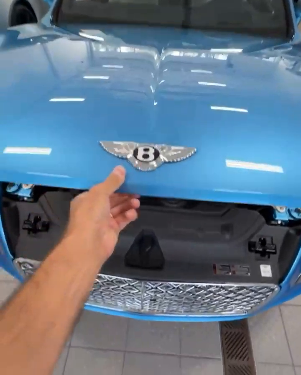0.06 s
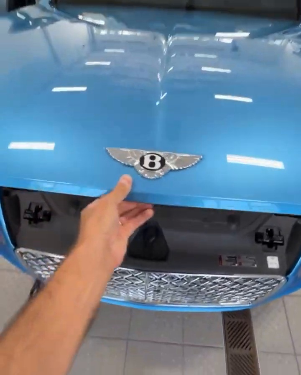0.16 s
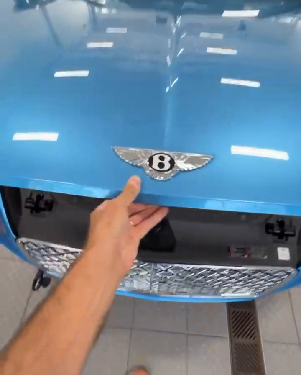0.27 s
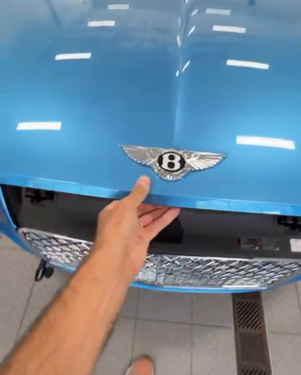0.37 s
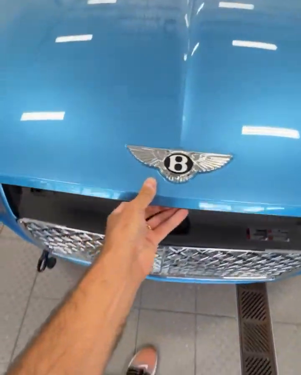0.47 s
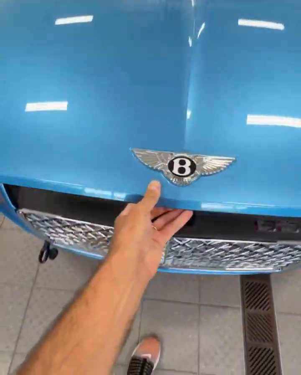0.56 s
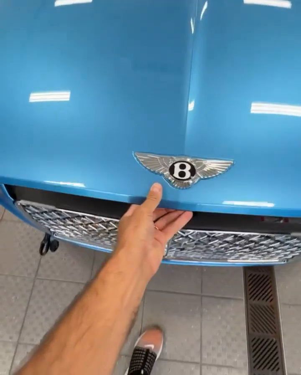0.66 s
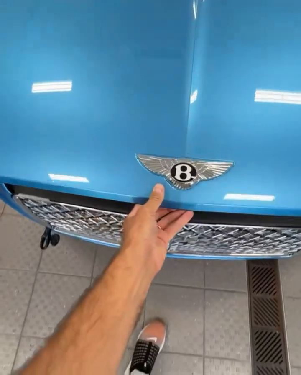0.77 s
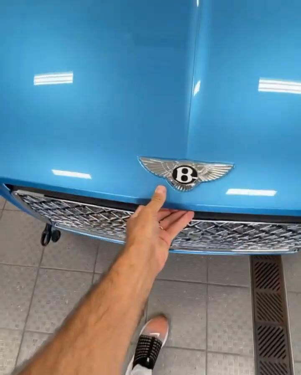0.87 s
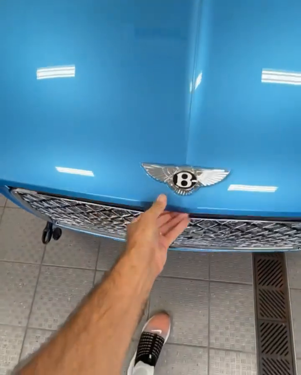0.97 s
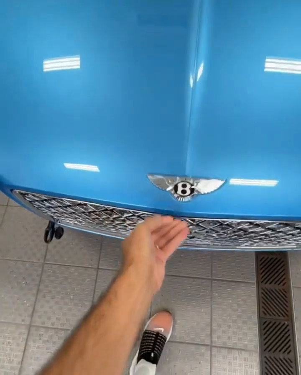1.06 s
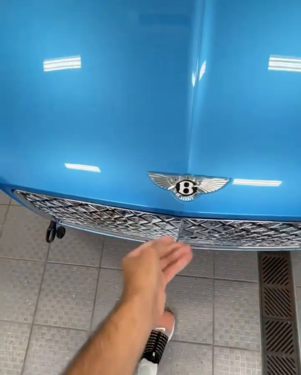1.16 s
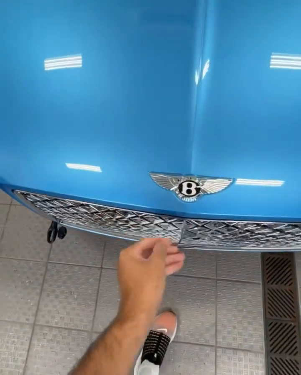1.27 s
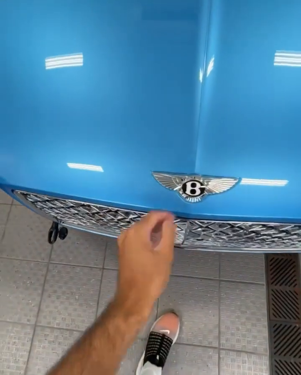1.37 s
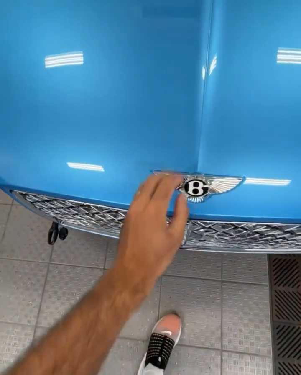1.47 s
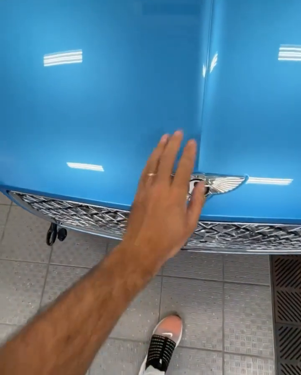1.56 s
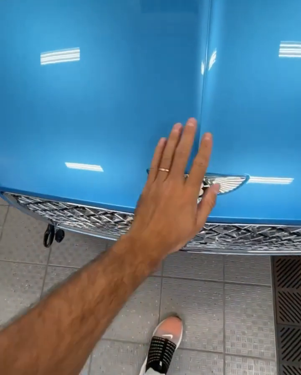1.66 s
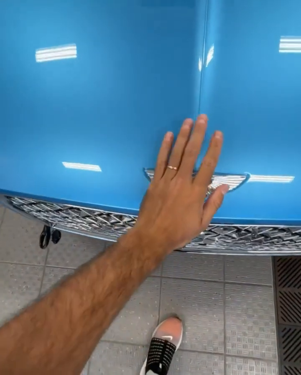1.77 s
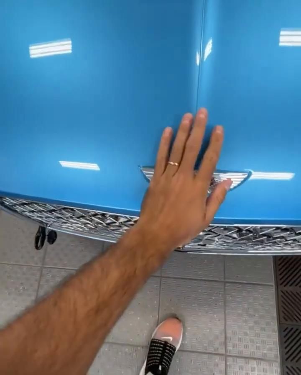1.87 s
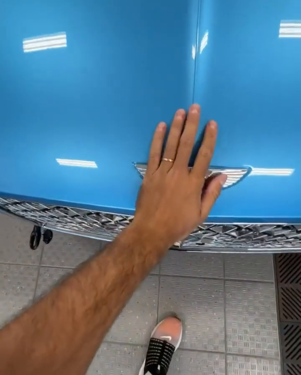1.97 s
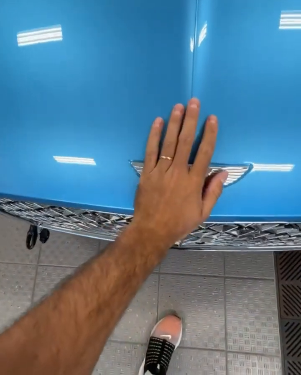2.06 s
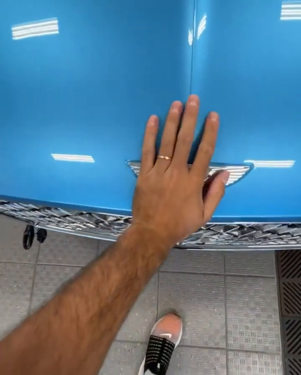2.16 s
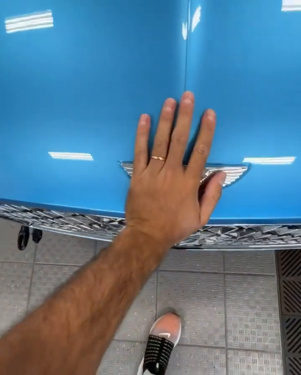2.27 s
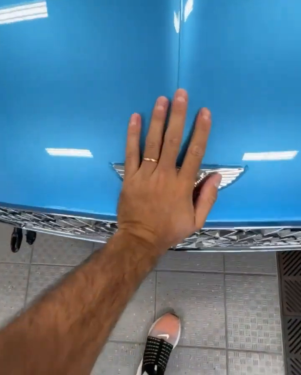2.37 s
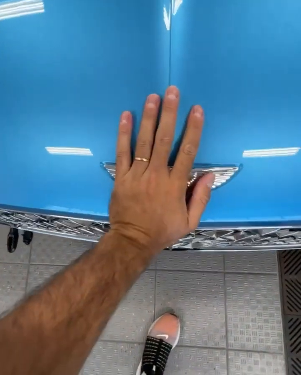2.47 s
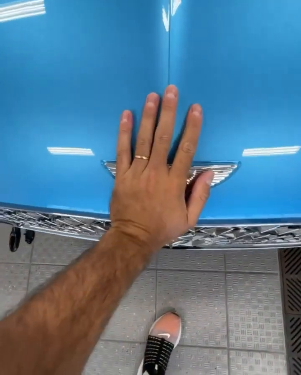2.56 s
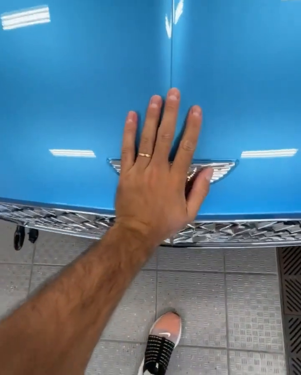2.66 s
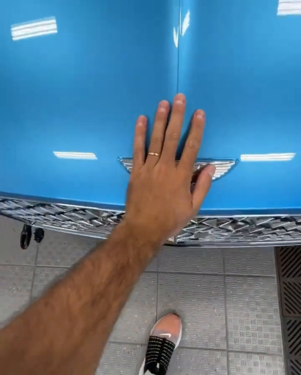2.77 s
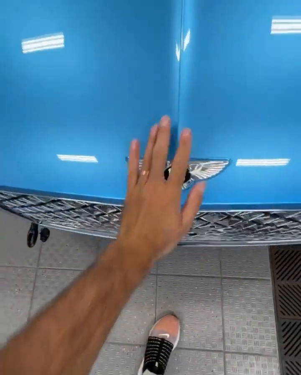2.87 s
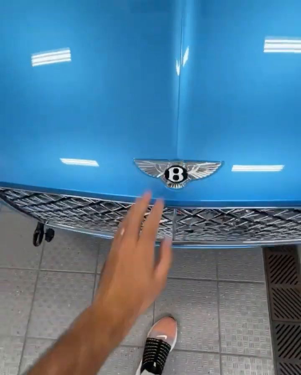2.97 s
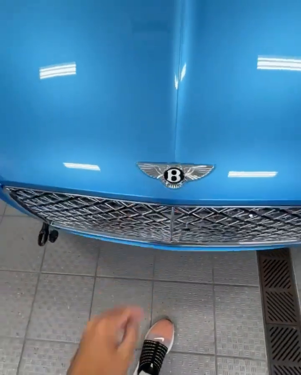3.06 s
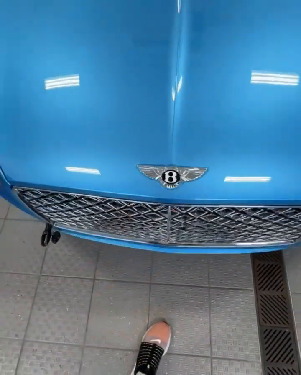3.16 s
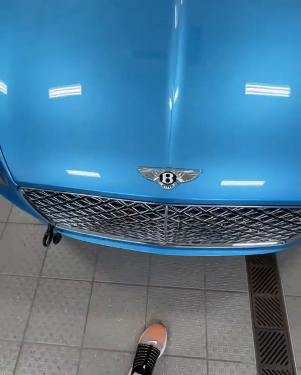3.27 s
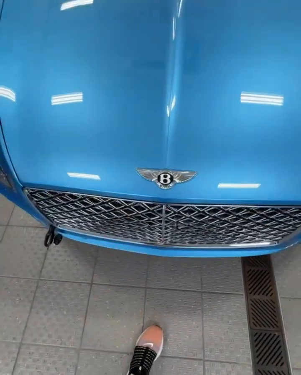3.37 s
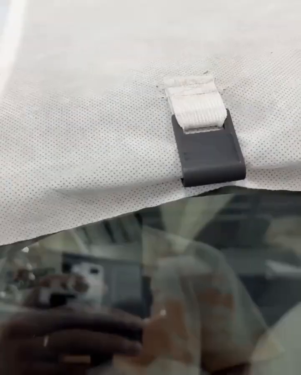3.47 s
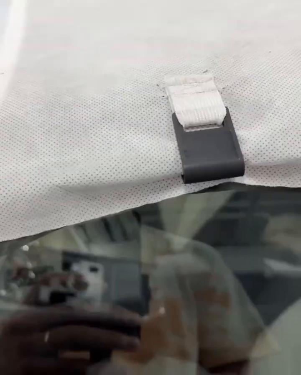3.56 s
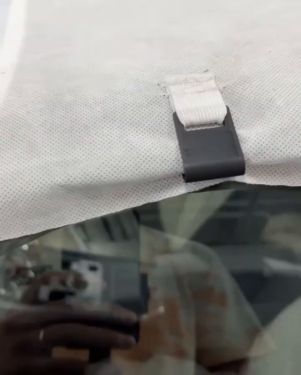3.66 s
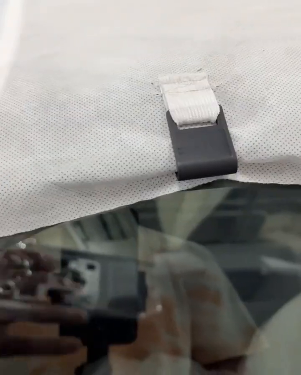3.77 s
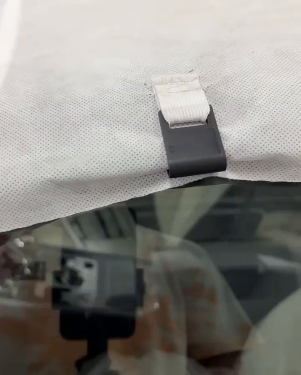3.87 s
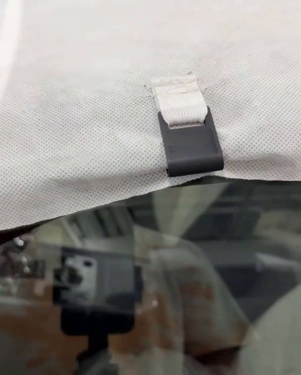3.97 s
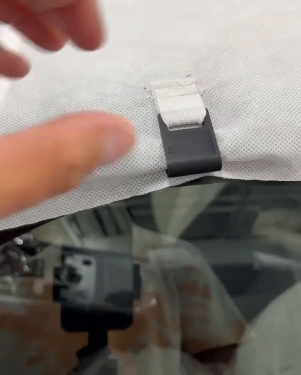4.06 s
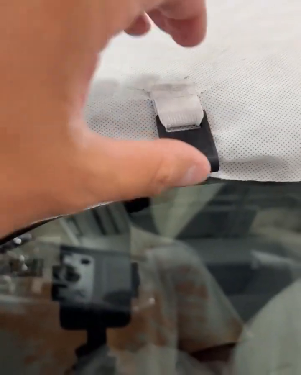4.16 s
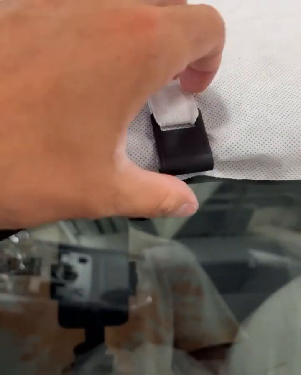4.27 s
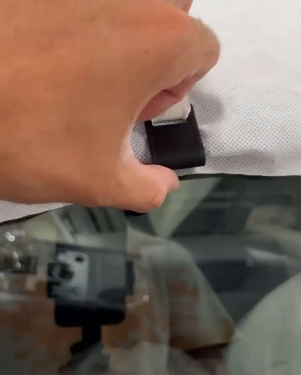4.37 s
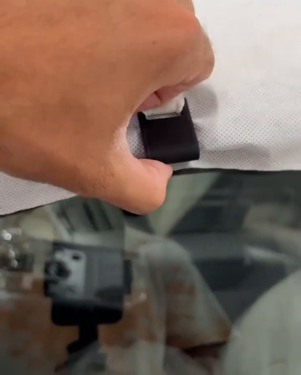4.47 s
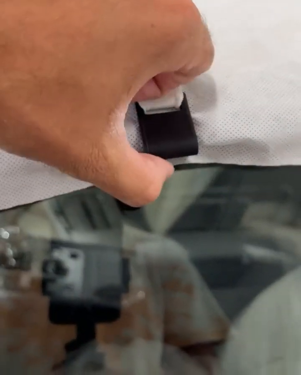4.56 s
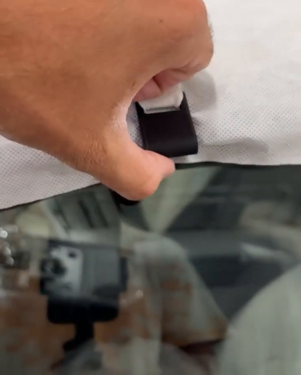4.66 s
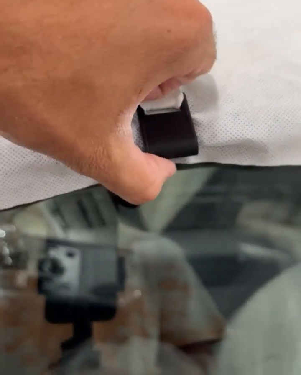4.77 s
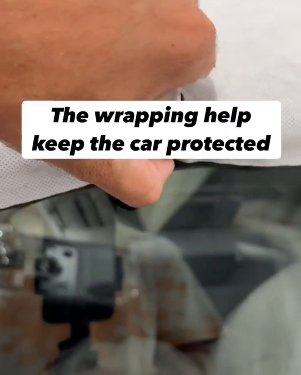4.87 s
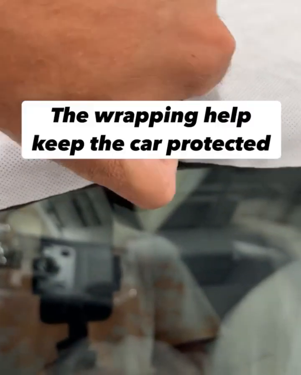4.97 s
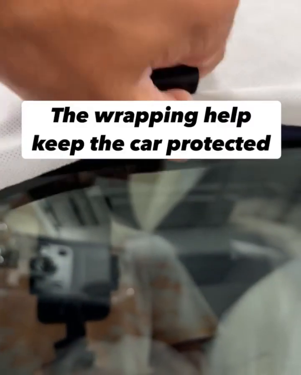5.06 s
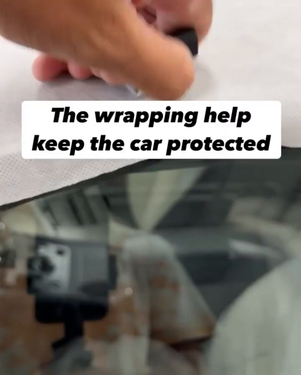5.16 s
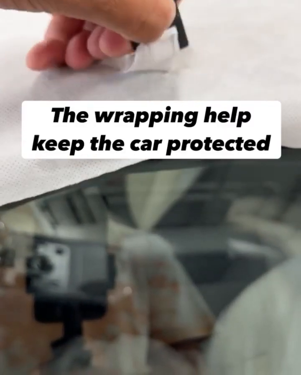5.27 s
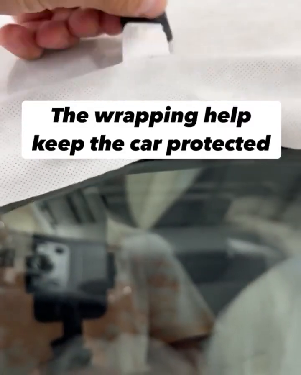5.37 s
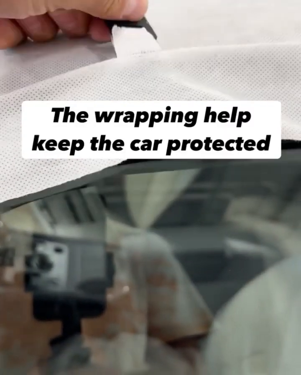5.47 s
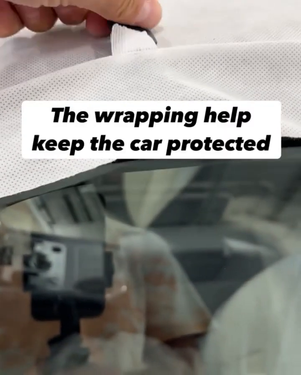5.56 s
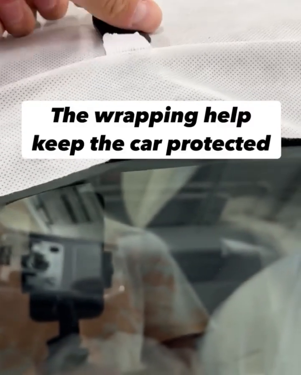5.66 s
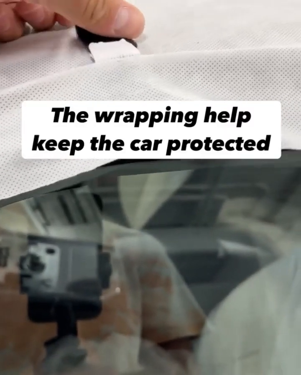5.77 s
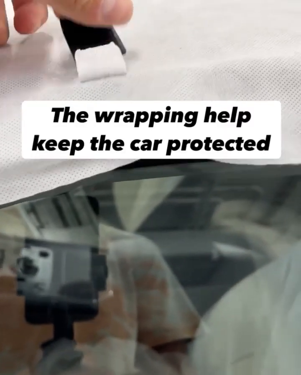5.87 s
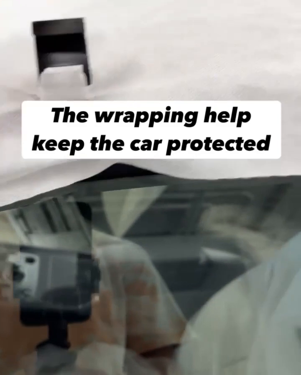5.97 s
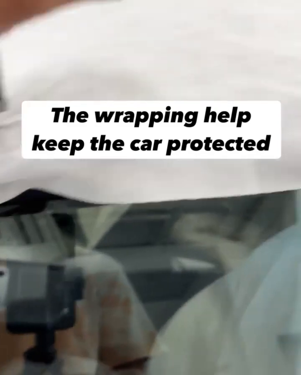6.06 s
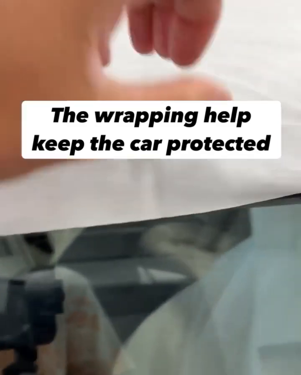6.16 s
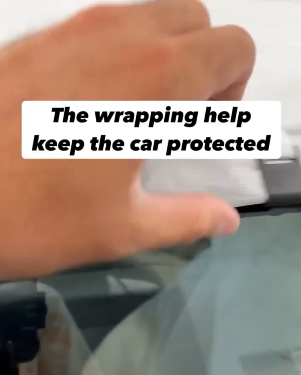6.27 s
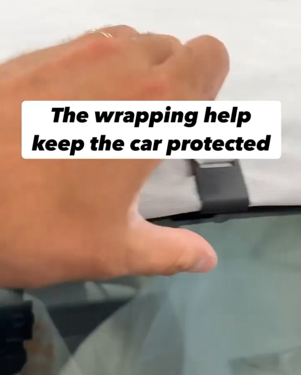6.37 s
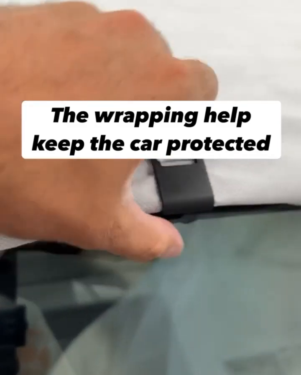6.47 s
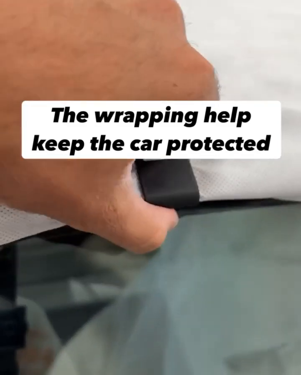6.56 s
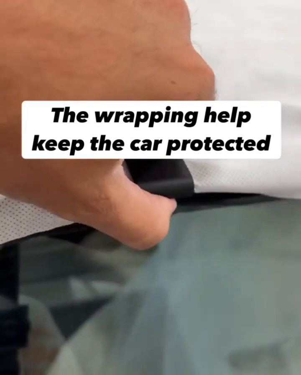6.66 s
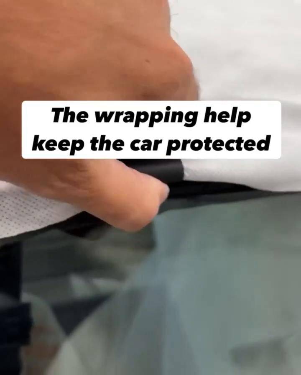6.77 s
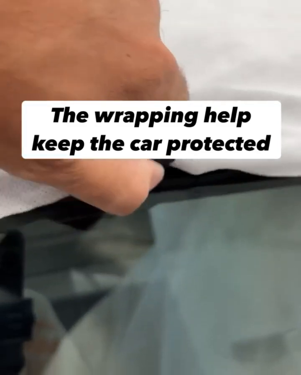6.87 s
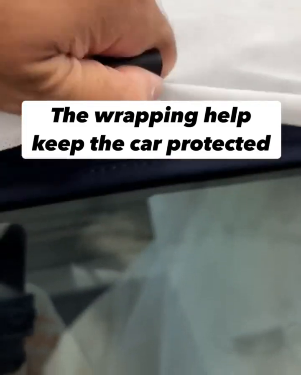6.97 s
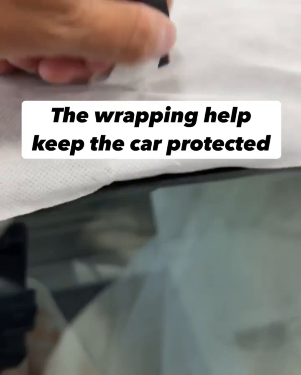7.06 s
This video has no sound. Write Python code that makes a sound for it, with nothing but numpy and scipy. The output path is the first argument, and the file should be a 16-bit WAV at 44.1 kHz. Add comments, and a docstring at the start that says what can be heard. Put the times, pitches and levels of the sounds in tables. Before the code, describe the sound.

Low ventilation rumble fills a tiled showroom, with a faint touch on metal at 0.2 s. At about 1.04 s a car bonnet drops onto its catch: a loud, bright, rattling crash lasting barely 0.15 s, with a heavy panel thump near 1.15 s. A long hard echo rings on and decays. From 2.2 s a palm presses the panel with short, dull, damped knocks, reaching a firm latch clunk with thin steel sizzle at 2.39 s; small thuds follow at 2.6 s and a faint release at 3.07 s. At 3.47 s the echo is cut off by a close, dry place with low wavering hum. Light cloth crackle and small ticks begin around 4.25 s, sharp plastic snaps come at 5.03 and 5.16 s, then rustling strokes. Fabric drags near 6.65 s; the hardest crack, with a deep pane thump, hits at 6.9 s, another snap at 7.05 s.

```python
"""Car bonnet slam, then clips at a window

In a tiled showroom a hand drops a car bonnet onto its catch, then presses until the latch shuts: struck
modes and rattle noise, with a long echo over ventilation. After a cut, close to the microphone, fingers
work plastic clips along a fabric cover at the edge of a window pane: noise cracks over a thumping pane,
and fibre crackle for the cloth, above a low wavering hum.
"""
import sys
import numpy as np
from scipy import signal
from scipy.fft import rfft, irfft
from scipy.io import wavfile
from scipy.ndimage import uniform_filter1d

SR = 44100
rng = np.random.default_rng(int(sys.argv[2]) if len(sys.argv) > 2 else 0)


def master_out(mix):
    """Clip the mix to full scale and print it as 16-bit PCM to the path in sys.argv[1]."""
    frames = np.transpose(np.atleast_2d(mix))
    ceiling = np.clip(frames, -1, 1)
    pcm = np.round(ceiling * 32767).astype(np.int16)
    wavfile.write(sys.argv[1], SR, pcm)


N = 313551

CUT_S = 3.47  # the showroom gives way to the window
PALM_S = 1.8  # from here a palm lies on the panel
# How alike the two microphone ports hear a room. Each row: frequency in Hz, left-right likeness (-1 to 1).
PORT_LIKENESS = [(60, 0.97), (150, 1), (380, 0.42), (950, -0.18), (2380, 0.007), (5980, 0.18),
                 (15000, -0.34)]
# How far a room leans to the left port. Each row: frequency in Hz, left minus right in dB.
PORT_LEAN = [(60, 0.46), (240, 0.175), (950, 2.46), (3770, 4.1), (15000, 25)]


def bonnet():
    """Each blow rings the stiff edge, bends the wide panel, rattles the catch and shakes the car's nose."""
    # Blows on the bonnet. Each row: start in seconds, edge ring peak in dB, panel flex peak in dB,
    # rattle in dB, rattle tilt in dB per octave, body boom peak in dB; all before the left-right lean.
    blows = [(0.214, -36.5, -59.5, -37.5, -9, -58.5), (1.038, -6, -45, -11, -1.5, -44.5),
             (1.051, -4.5, -11, -16, -3, -38.5), (1.063, -6, -12, -11, 1.6, -43),
             (1.071, -7, -25, -12, 5, -45), (1.096, -25, -39, -18, -15, -32),
             (1.116, -20, -61, -28, 1.5, -42.5), (1.151, -10.5, -2, -15.5, 2, -12),
             (1.162, -12, -30, -18, 1, -24), (1.183, -17, -10.5, -25.5, 3.5, -48),
             (2.193, -22.5, -23, -33, -4.5, -38), (2.243, -18.5, -28, -30, -8.5, -27),
             (2.271, -28.5, -23, -53, -22, -46), (2.292, -19, -24, -36, -6, -42),
             (2.308, -22, -21.5, -47.5, -5, -43), (2.337, -24, -15.5, -69, 4, -29),
             (2.369, -21, -9, -31, -6, -55), (2.379, -12.5, -17, -28.5, -4, -33),
             (2.388, -18.5, -8.5, -14, 2, -6), (2.397, -15, -14.5, -16, 0, -25),
             (2.604, -26.5, -36, -60, -9, -24), (2.617, -24.5, -18.5, -59, -11, -20),
             (2.646, -31, -25.5, -55, -6, -36), (3.069, -36.5, -36, -69, -2, -36)]
    # Bending modes of the wide panel. Each row: frequency in Hz, level in dB, free t60 in seconds.
    panel_modes = [(174, -1, 0.12), (198.3, -14.5, 0.17), (258.8, -10.5, 0.12), (168, -23, 0.93),
                   (181.2, -26.5, 1.3)]
    # Modes of the stiff front edge. Each row: frequency in Hz, level in dB, free t60 in seconds.
    edge_modes = [(316, -4.5, 0.0404), (403.7, -10, 0.23), (472.6, -1.5, 0.055), (498, -8.5, 0.17),
                  (567, -0.5, 0.068), (629, -6.5, 0.051), (664, -8.5, 0.11), (724, -13.5, 0.06),
                  (870, -11, 0.035)]
    # Catch and grille, before the tilt of each blow. Each row: frequency in Hz, level in dB per Hz.
    rattle_spectrum = [(410, -86.5), (700, -10), (2100, -14), (3080, -16), (3330, -21), (4060, -25.5),
                       (7870, -30), (11500, -39), (15400, -47.5), (16500, -59.5)]
    # Thin steel sizzle of the latch. One row: level in dB, centre in Hz, width in Hz, t60 in seconds.
    latch_sizzle = (-36, 14600, 1700, 0.1)
    latch_s = 2.388  # the latch shuts
    palm_db_per_s = 277  # extra decay under the palm
    rattle_t60 = 0.089  # seconds, without the palm
    right_lag_ms = 0.28  # the catch is nearer the left port
    bright_lean = amp([[1.25], [-1.25]])  # dB, left then right
    dull_lean = amp([[1.3], [-1.3]])

    out, t = np.zeros((2, N)), np.arange(SR) / SR
    boom = struck([(69, 0, 0.24)], contact_ms=0.93, travel_ms=14.0)  # the nose shakes as a whole
    flex = struck(panel_modes, contact_ms=2.2, travel_ms=9.0)
    for s, edge_db, flex_db, rattle_db, tilt_db, boom_db in blows:
        palm = amp(-palm_db_per_s * t * (s > PALM_S))
        # the tilt turns about 2000 Hz: harder contact is brighter
        colour = [(hz, db + tilt_db * np.log2(hz / 2000)) for hz, db in rattle_spectrum]
        noise = evened(coloured(rng.standard_normal((3, len(t))), colour))
        rattle = 0.21 * noise[0] + noise[1:]  # a little is shared by both ports
        rattle = rattle * amp(rattle_db - 60 * t / rattle_t60) * np.minimum(t / 0.0015, 1)
        edge = amp(edge_db) * struck(edge_modes, contact_ms=0.88, crunch_ms=3.3)
        bright = (edge + rattle) * palm * bright_lean
        add(out[0], s, bright[0])
        add(out[1], s + right_lag_ms / 1000, bright[1])
        dull = amp(flex_db) * flex * palm + amp(boom_db) * boom
        add(out, s, dull * dull_lean)

    db, hz, width, t60 = latch_sizzle
    sizzle = np.array([steep(x, hz, width) for x in rng.standard_normal((2, len(t)))])
    add(out, latch_s, amp(db - 60 * t / t60) * sizzle)
    return out


def hall(x):
    """Showroom echo: sparse taps of random sign, each band dying at its own speed, on three paths."""
    # Decay of the tiled room. Each row: frequency in Hz, t60 in seconds.
    decay = [(60, 1.29), (200, 0.98), (1000, 2.08), (3000, 1.94), (6000, 1.5), (9000, 0.7), (14000, 0.21)]
    # Colour of the echo at its start. Each row: frequency in Hz, level in dB.
    echo_colour = [(60, -2), (200, 1.5), (600, 0.5), (1400, 12), (2600, 2.5), (4000, 6), (8000, 10),
                   (12000, 6)]
    hz, t, _ = signal.stft(np.zeros(2 * SR), SR, nperseg=1024)
    same = np.clip(read(PORT_LIKENESS, hz), -1, 1)[:, None]
    lean = amp(read(PORT_LEAN, hz))[:, None]
    dying = amp(read(echo_colour, hz)[:, None] - 60 * t / read(decay, hz)[:, None])
    turn = 2 * np.pi * 25 * np.arange(4 * SR) / SR  # 25 Hz turn from path to path
    out = np.zeros((2, N))
    for k in range(3):
        taps = np.zeros((2, 2 * SR))
        slots = np.arange(300, 2 * SR - 20, 20)  # one tap at random in every 20 samples
        at = slots + rng.integers(0, 20, (2, len(slots)))
        np.put_along_axis(taps, at, rng.choice([-1., 1.], at.shape), 1)
        z = signal.stft(taps, SR, nperseg=1024)[2]
        z[1] = (same * z[0] + np.sqrt(1 - same ** 2) * z[1]) / lean
        tail = signal.istft(z * dying, SR, nperseg=1024)[1]
        # the three gains keep the total power steady
        fed = x.mean(0)[:4 * SR] * np.sqrt(2 / 3) * np.cos(turn + np.pi * k / 3)
        add(out, 0, signal.fftconvolve(fed[None], tail / np.linalg.norm(tail[0]), axes=1))
    return out


def clips():
    """A short plastic crack, brighter when harder, and the window pane thumping under it."""
    # Clip snaps, ticks and short scrapes. Each row: start in seconds, crack peak in dB,
    # crack centre in Hz, crack t60 in seconds, pane thump peak in dB.
    snaps = [(3.677, -54.5, 927, 0.069, -35), (4.236, -49, 2500, 0.016, -57), (4.251, -52, 900, .025, -33),
             (4.31, -46, 2900, .05, -64), (4.319, -41, 1530, .04, -60), (4.326, -40, 1560, 0.017, -60),
             (4.371, -29.5, 7250, 0.028, -29.5), (4.385, -34.5, 2560, 0.014, -54),
             (4.428, -45, 2300, .02, -64), (4.442, -45, 2860, 0.033, -52), (4.531, -53, 1100, .04, -60),
             (5.027, -12, 5300, 0.011, -64), (5.029, -17.5, 2190, 0.011, -22.5),
             (5.037, -26, 2530, 0.029, -47), (5.114, -37.5, 1480, 0.0098, -33.5),
             (5.161, -16, 5450, 0.022, -24), (5.165, -27.5, 1760, 0.026, -40),
             (5.402, -31, 2060, 0.0063, -56), (5.461, -38, 1090, 0.012, -39),
             (6.083, -52.5, 5600, 0.014, -63), (6.284, -34, 2240, 0.044, -39.5),
             (6.309, -40.5, 1700, 0.0095, -33.5), (6.434, -49, 2800, 0.016, -64),
             (6.58, -48, 1200, 0.034, -64), (6.894, -10.5, 3730, 0.011, -13.5),
             (6.898, -4, 1555, 0.017, -4.5), (6.906, -29.5, 960, 0.057, -18.5),
             (7.042, -32.5, 6500, .03, -37), (7.047, -17, 2240, 0.0088, -20.5)]
    # Modes of the pane, deepest first. Each row: frequency in Hz, relative level in dB, t60 in seconds.
    pane_modes = [(76.5, 0, 0.08), (154, -3.5, 0.046), (309, -20, 0.084), (420, -15.5, 0.02),
                  (833, 8.5, 0.041), (1590, 4.5, 0.026)]
    out, t = np.zeros(N), np.arange(SR // 10) / SR
    thump = struck(pane_modes[1:], contact_ms=1.946, travel_ms=7.51)
    deep = struck(pane_modes[:1], contact_ms=2.2, travel_ms=12.3)
    for s, db, hz, t60, thump_db in snaps:
        onset = np.minimum(t / (0.092 * t60), 1)  # a longer scrape starts softer
        burst = rng.standard_normal(len(t)) * amp(-60 * t / t60) * onset
        spray = amp(-7.5 + 0.24 * db) * steep(burst, 4500, 16000)
        add(out, s, amp(db) * peaked(steep(burst, hz, 0.67 * hz) + spray))
        # only hard snaps bend the whole pane
        add(out, s, amp(thump_db) * thump + amp(1.36 * thump_db) * deep)
    return out


def fabric():
    """Clumped fibre crackle through the weave: a rub and a higher hiss move by stroke, a dull drag below."""
    # Finger strokes on the cloth. Each row: peak in seconds, rise in seconds, fall in seconds,
    # rubbing in dB, rubbing pitch in Hz, high hiss in dB, high hiss pitch in Hz.
    strokes = [(3.7, 0.088, 0.076, -67, 2000, -73, 6900), (4.25, 0.028, .1, -62.5, 2600, -65, 6500),
               (4.32, 0.081, 0.19, -55.5, 2820, -56, 7350), (4.379, 0.12, 0.29, -50, 2720, -56.5, 7400),
               (4.584, 0.057, 0.19, -53.5, 2380, -57, 7350), (4.804, 0.069, 0.1, -53.5, 3380, -58.5, 7100),
               (4.9, 0.11, .2, -57, 2500, -59.5, 7400), (5.027, 0.11, 0.13, -34.5, 2300, -39.5, 5750),
               (5.161, 0.055, 0.028, -41, 2700, -43, 5800), (5.22, 0.19, 0.24, -57, 2690, -55, 6100),
               (5.33, .1, 0.087, -67, 3600, -43.5, 6000), (5.41, 0.22, 0.27, -47, 2900, -44.5, 6130),
               (5.602, 0.087, 0.059, -53, 3300, -45, 4940), (5.68, 0.12, .3, -64, 2700, -67, 6200),
               (5.765, 0.096, 0.25, -53.5, 3000, -50, 6170), (5.83, 0.17, 0.1, -49.5, 2480, -54, 6000),
               (5.89, 0.084, 0.052, -55, 2400, -54.5, 6100), (6.3, 0.027, 0.45, -56, 2370, -74, 6340),
               (6.38, 0.12, 0.13, -57, 3300, -63.5, 6100), (6.46, 0.28, 0.36, -77, 3000, -65.5, 6150),
               (6.67, 0.35, 0.21, -52.5, 2440, -60, 7450), (6.78, 0.23, 0.16, -55.5, 2260, -62, 6760),
               (6.895, 0.07, 0.23, -39.5, 2120, -47.5, 6400), (6.84, 0.24, 0.23, -54.5, 2410, -52.5, 7140),
               (7.044, 0.052, 0.14, -38, 2660, -49, 6140), (7.11, 0.08, .1, -41, 2670, -37, 6500)]
    # Cover dragged over the sill. Each row: peak in seconds, rise in seconds, fall in seconds,
    # level in dB, pitch in Hz.
    drags = [(6.64, 0.12, 0.27, -43.5, 930), (7.2, 0.13, 0.13, -45.5, 770), (6.675, .12, 0.17, -49, 1610)]
    # Colour of the weave. Each row: frequency in Hz, level in dB per Hz.
    weave_spectrum = [(180, -1), (300, 10), (607, 5), (2890, -3.5), (3770, -6.5), (9980, -1.5),
                      (12600, -8.5), (15400, 1), (16500, -44)]
    s, rise, fall, rub_db, rub_hz, hiss_db, hiss_hz = np.transpose(strokes)[..., None]
    shape = swell(s, rise, fall)
    rub_gain, rub_hz = stroked(shape, rub_db, rub_hz)
    hiss_gain, hiss_hz = stroked(shape, hiss_db, hiss_hz)
    clumps = amp(2.6 * evened(uniform_filter1d(rng.standard_normal((2, N)), size=250)))
    # grain levels scatter widely in dB, so single fibres stand out
    grains = rng.standard_normal((2, N)) * amp(2.47 * np.minimum(rng.exponential(1, N), 6))
    crackle = grains * clumps
    weave = coloured(crackle, weave_spectrum)
    # each has a moving resonance and a broad fixed one
    hiss = evened(steep(weave[1], hiss_hz, 1230) + 1.67 * steep(weave[1], 6900, 5500))
    rub = evened(steep(weave[0], rub_hz, 1400) + 2.0 * steep(weave[0], 3490, 3600))
    drag = sum(amp(db) * swell(s, rise, fall) * steep(crackle[1], hz, 700)
               for s, rise, fall, db, hz in drags)
    return rub_gain * rub + hiss_gain * hiss + drag


def swell(s, rise, fall):
    """Gain that climbs to a peak at s and sinks again, straight in dB: 30 dB in each of rise and fall."""
    t = np.arange(N) / SR - s
    return amp(-30 * np.maximum(-t / rise, t / fall))


def stroked(shape, db, hz):
    """Level of overlapping strokes, and their pitch averaged by power, so the loudest leads."""
    power = shape ** 2 * amp(2 * db) + 1e-30
    total = power.sum(0)
    return np.sqrt(total), (power * hz).sum(0) / total


def widened(x, side_db):
    """Nearby reflections reach the two ports in opposite sense, above the bass."""
    # Spread of the close place, before side_db. Each row: frequency in Hz, side minus mid in dB.
    spread = [(60, -52), (130, -44), (290, -11.5), (640, 1), (1410, -8.5), (3100, -9), (6820, 4.5),
              (15000, -4)]
    taps = rng.standard_normal(1300) * np.exp(-np.arange(1300) / (0.0078 * SR))
    reflected = signal.oaconvolve(x, taps / np.linalg.norm(taps))[:N]
    side = amp(side_db) * coloured(reflected, spread)
    return np.array([x + side, x - side])


def hum():
    """Narrow bands of noise, each wavering in level like an unsteady drone."""
    # Hum bands. Each row: centre in Hz, width of each of two passes in Hz, level in dB.
    drones = [(43, 31, -54.5), (55.4, 13.6, -46), (86, 123, -56.5), (129.2, 17.3, -47), (175, 113, -60.5),
              (351.4, 27, -62.5)]
    return sum(amp(db) * steep(rng.standard_normal(N), hz, width) for hz, width, db in drones)


def air(spectrum, patchy_db):
    """Steady room noise from random short-time spectra with drifting patches, rms 1."""
    frames, hz = N // 512 + 5, np.fft.rfftfreq(2048, 1 / SR)
    a, b, c, d, patches = rng.standard_normal((frames, 1025, 5)).T
    patches = uniform_filter1d(patches, size=10, axis=0)
    patches = evened(uniform_filter1d(patches, size=5, axis=1))
    same = np.clip(read(PORT_LIKENESS, hz), -1, 1)[:, None]
    left = a + 1j * b
    right = same * left + np.sqrt(1 - same ** 2) * (c + 1j * d)
    right = right / amp(read(PORT_LEAN, hz))[:, None]
    steadier_bass = np.minimum(hz / 300, 1)[:, None]
    level_db = read(spectrum, hz)[:, None] + patchy_db * patches * steadier_bass
    z = np.array([left, right]) * amp(level_db)
    return evened(signal.istft(z, nperseg=2048, noverlap=1536)[1][:, :N])


def struck(modes, contact_ms, crunch_ms=0, travel_ms=0):
    """Modes rung by a half-sine push, repeated unevenly by a crunch; bending waves bring low modes late."""
    t = np.arange(SR) / SR
    hz, db, t60 = np.transpose(modes)[..., None]
    side = (-1) ** np.arange(len(modes))[:, None]  # neighbouring modes start in opposite directions
    late = np.maximum(t - travel_ms / 1000 * np.sqrt(100 / hz), 0)  # travel_ms is the delay at 100 Hz
    ring = (side * amp(db - 60 * late / t60) * np.sin(2 * np.pi * hz * late)).sum(0)
    push = np.sin(np.pi * np.clip(t[:900] * 1000 / contact_ms, 0, 1))
    if crunch_ms:
        crunch = rng.standard_normal(1500) * np.exp(-t[:1500] * 1000 / crunch_ms)
        push = signal.oaconvolve(push, crunch)
    return peaked(signal.oaconvolve(ring, push)[:len(t)])


def band(x, hz, width):
    """A resonance that follows the curve hz: shift down, smooth, shift back."""
    turn = np.exp(2j * np.pi * np.cumsum(hz * np.ones(len(x))) / SR)
    r = np.exp(-np.pi * width / SR)
    return 2 * (turn * signal.lfilter([1 - r], [1, -r], x / turn)).real


def steep(x, hz, width):
    """A resonance applied twice, rms 1."""
    return evened(band(band(x, hz, width), hz, width))


def coloured(x, spectrum):
    """Filters by a spectrum table."""
    gain = amp(read(spectrum, np.fft.rfftfreq(x.shape[-1], 1 / SR)))
    return irfft(rfft(x) * gain, x.shape[-1])


def read(points, hz):
    """Reads a spectrum table on a log-frequency axis."""
    f, value = np.transpose(points)
    return np.interp(np.log(hz + 1), np.log(f + 1), value)


def amp(db):
    """Decibels to gain."""
    return 10 ** (np.asarray(db) / 20)


def evened(x):
    """Scales to rms 1."""
    return x / np.sqrt(np.mean(x ** 2) + 1e-20)


def peaked(x):
    """Scales to peak 1."""
    return x / (abs(x).max() + 1e-12)


def add(mix, s, sound):
    """Mixes a sound in at time s."""
    part = mix[..., round(s * SR):][..., :sound.shape[-1]]
    part += sound[..., :part.shape[-1]]


def scene():
    """The showroom, then the close scene at the window."""
    # Showroom ventilation. Each row: frequency in Hz, relative level in dB per Hz.
    ventilation = [(12, -64), (20, -32), (37, -7), (70, 1), (150, -11), (210, -10.5), (285, -14.5),
                   (459, -16), (759, -19.5), (1150, -17.5), (2260, -27), (3250, -30.5), (3700, -28),
                   (4300, -32.5), (6910, -33), (11800, -61.5), (16000, -67)]
    # Room noise at the window. Each row: frequency in Hz, relative level in dB per Hz.
    window_room = [(94, -12), (160, 1), (347, -9.5), (440, -11.5), (620, -17.5), (1200, -21.5), (2000, -27),
                   (3300, -34), (4050, -29.5), (4700, -42.5), (7500, -50.5), (9500, -60)]
    t = np.arange(N) / SR
    blows = bonnet()
    to_room = amp(-3.5 * (t > PALM_S))  # under the palm less reaches the room
    echo = amp(-0.67) * hall(blows * to_room)
    showroom = blows + echo + amp(-43) * air(ventilation, patchy_db=1.2)

    room = amp(-53.5) * air(window_room, patchy_db=1.95)[0] + hum()
    window = widened(clips(), side_db=-8.5) + widened(fabric(), side_db=-6.5) + widened(room, side_db=1.5)
    after = np.clip((t - CUT_S) / 0.0012, 0, 1)
    return showroom * (1 - after) + window * after


def record(dry):
    """Gain control pulls the showroom down after each slam and creeps back; then the band limit."""
    t = np.arange(N) / SR
    power_db = 10 * np.log10(abs(uniform_filter1d((dry ** 2).mean(0), size=2000)) + 1e-12)
    fall = 4.9 * t  # the held level sinks this many dB a second
    held_db = np.maximum.accumulate(power_db + fall) - fall
    over_db = np.maximum(held_db + 26, 0)  # above a threshold of -26 dB
    step = 1 / (0.15 * SR)  # smoothed over 0.15 s
    slow_db = signal.lfilter([step], [1, step - 1], over_db)
    ducked = dry / amp(0.4 * slow_db * (t < CUT_S))
    low_cut = signal.butter(3, 42, "high", fs=SR, output="sos")  # small microphone
    ducked = signal.sosfilt(low_cut, ducked)
    ducked = ducked / (1 + abs(ducked) ** 6) ** (1 / 6)  # soft overload near full scale
    top_cut = signal.firwin(511, 16450, window=("kaiser", 9), fs=SR)
    return signal.oaconvolve(ducked, top_cut[None], "same")


dry = scene()
out = record(dry)
master_out(out)
```